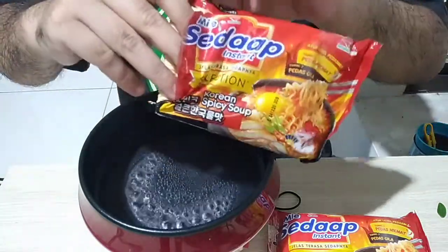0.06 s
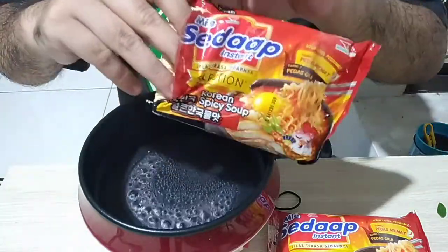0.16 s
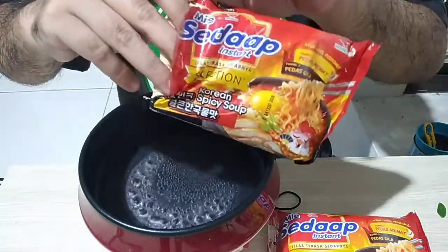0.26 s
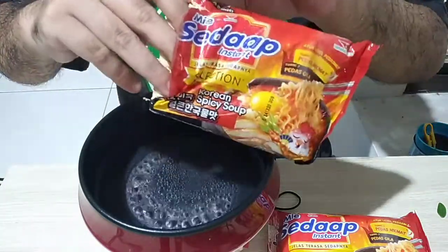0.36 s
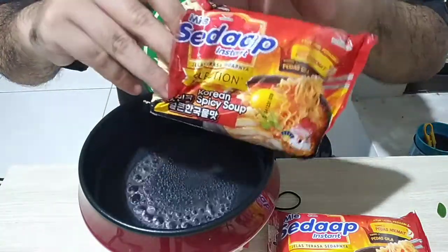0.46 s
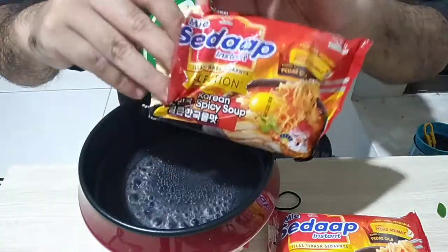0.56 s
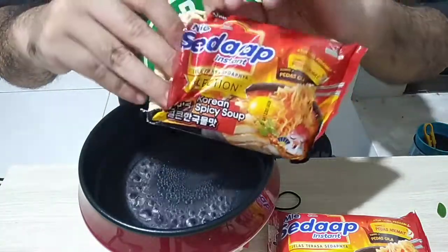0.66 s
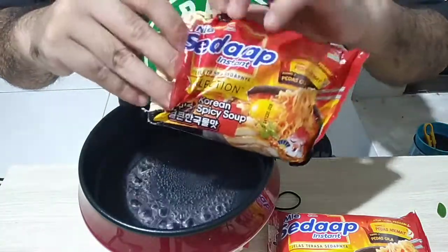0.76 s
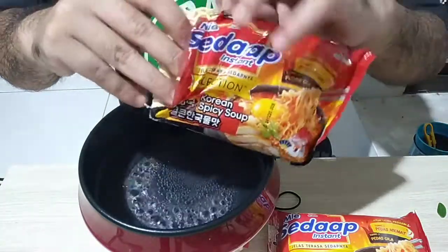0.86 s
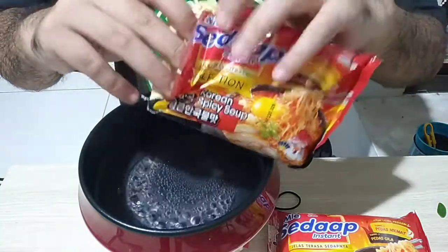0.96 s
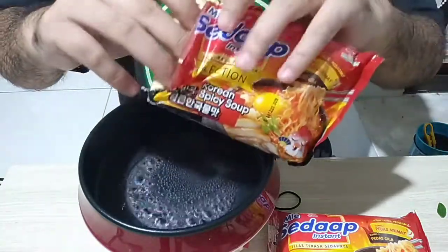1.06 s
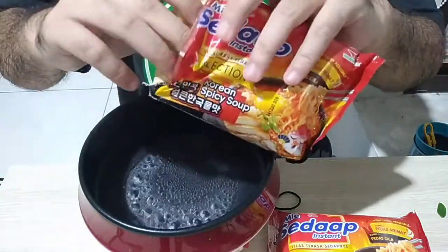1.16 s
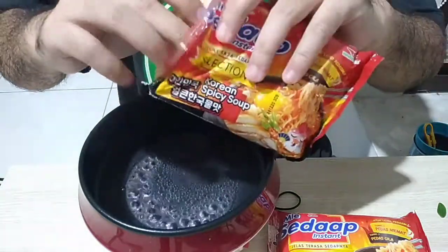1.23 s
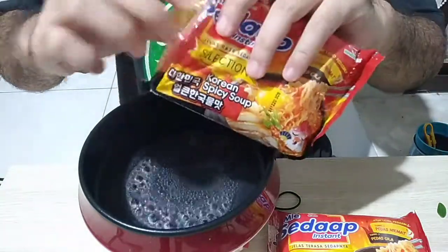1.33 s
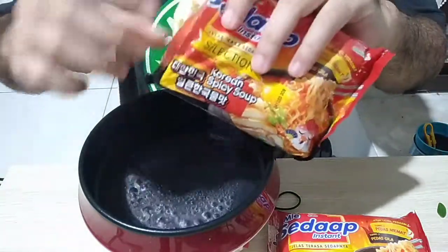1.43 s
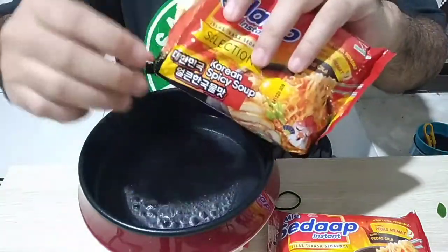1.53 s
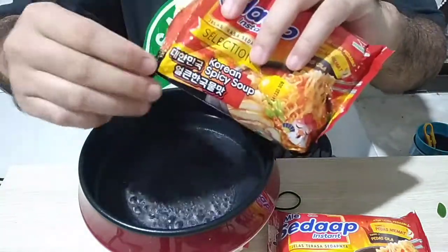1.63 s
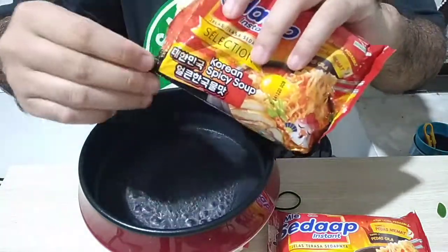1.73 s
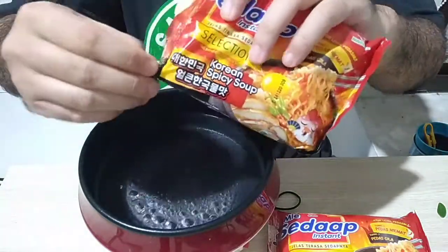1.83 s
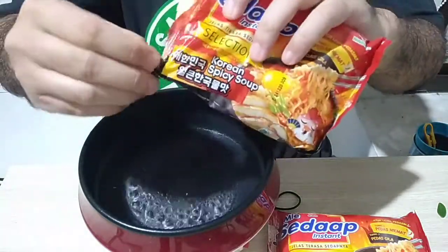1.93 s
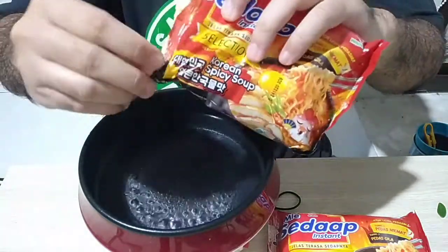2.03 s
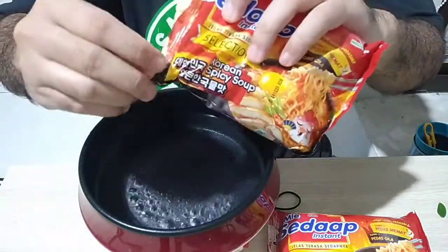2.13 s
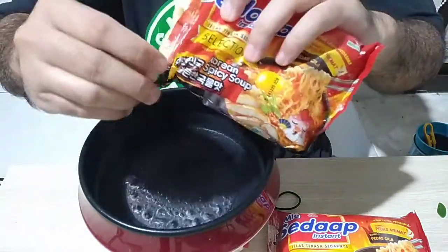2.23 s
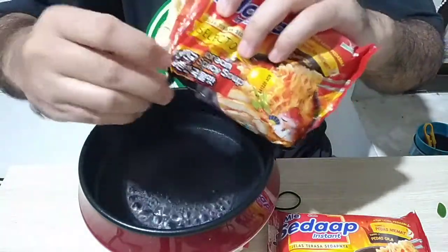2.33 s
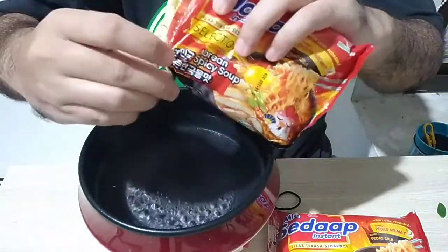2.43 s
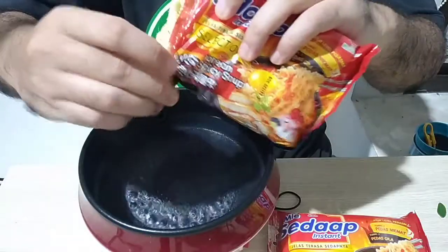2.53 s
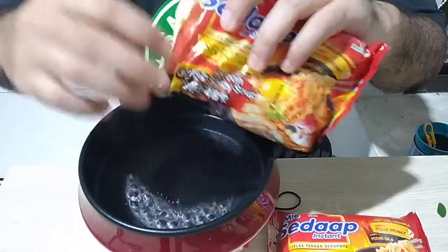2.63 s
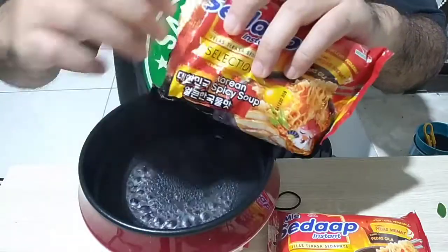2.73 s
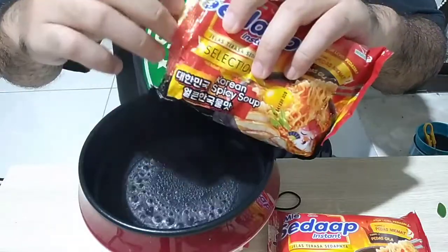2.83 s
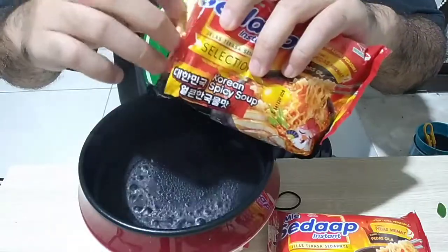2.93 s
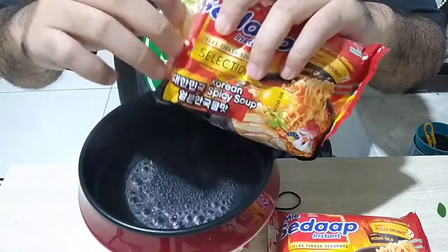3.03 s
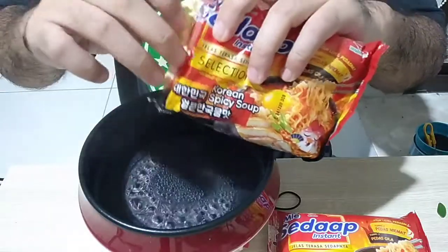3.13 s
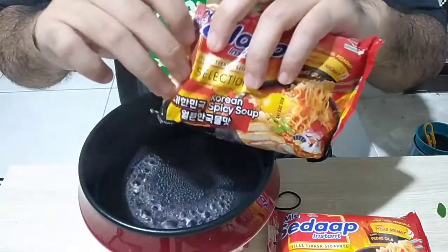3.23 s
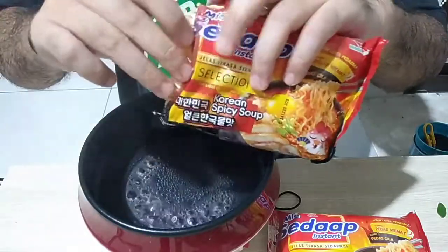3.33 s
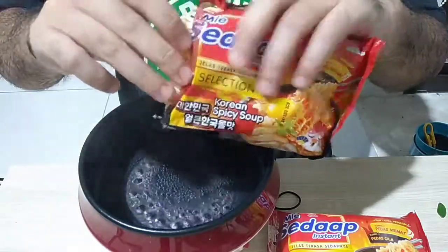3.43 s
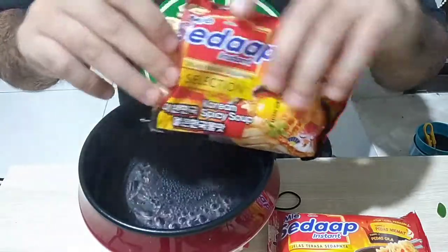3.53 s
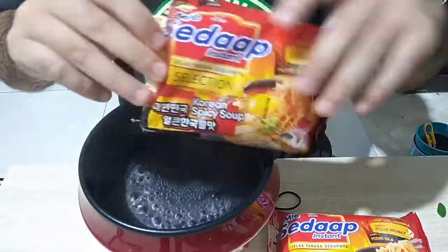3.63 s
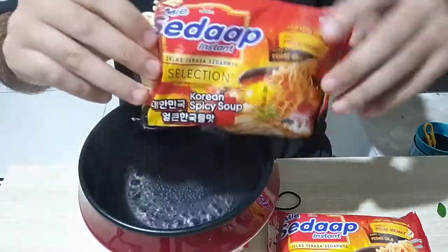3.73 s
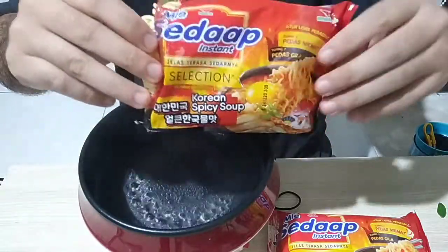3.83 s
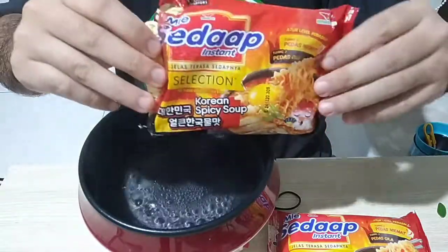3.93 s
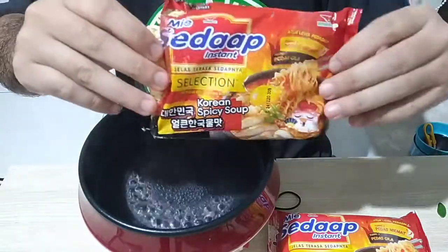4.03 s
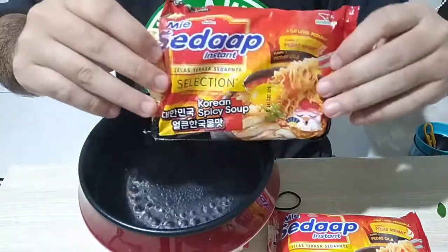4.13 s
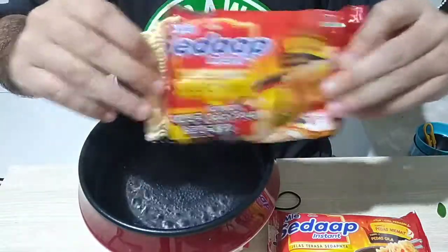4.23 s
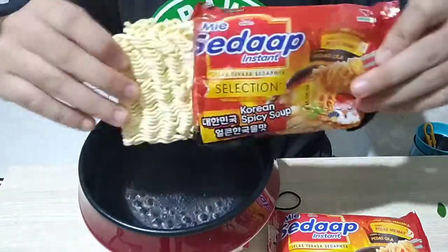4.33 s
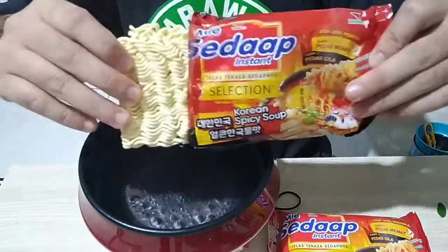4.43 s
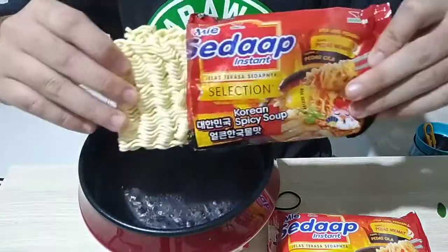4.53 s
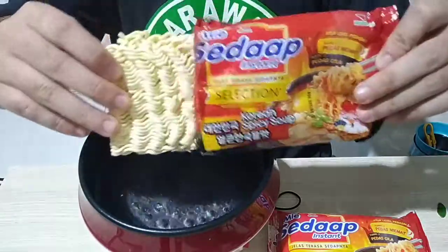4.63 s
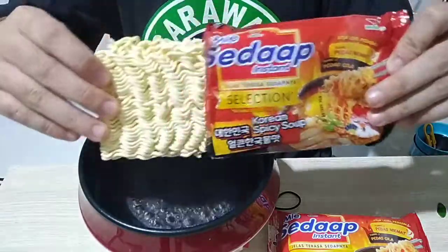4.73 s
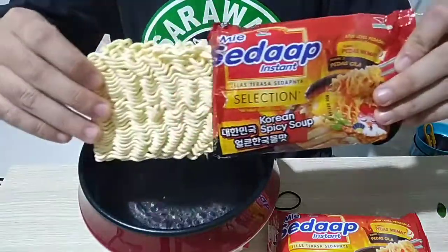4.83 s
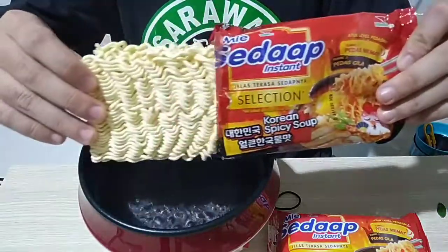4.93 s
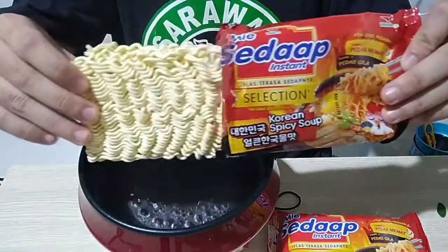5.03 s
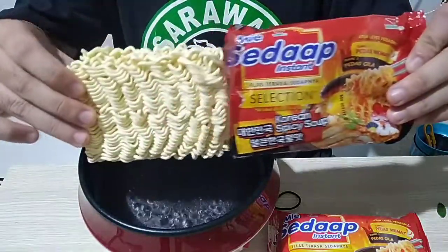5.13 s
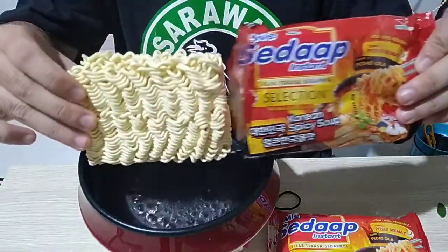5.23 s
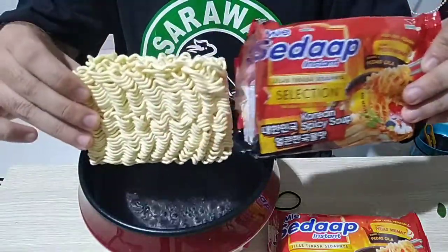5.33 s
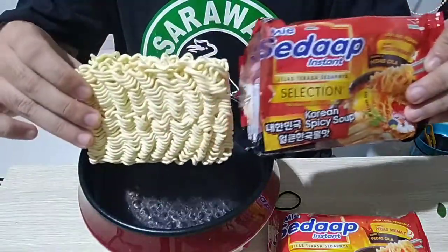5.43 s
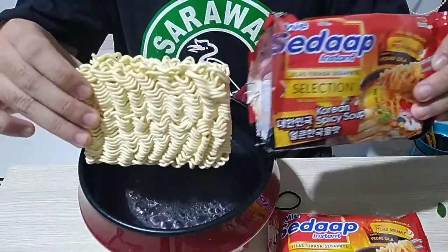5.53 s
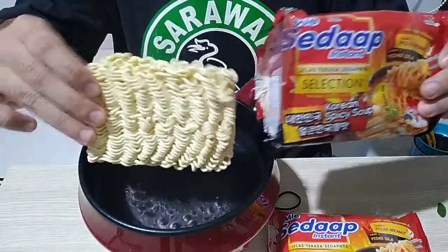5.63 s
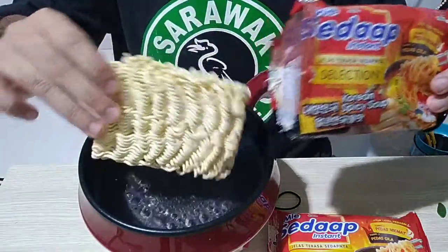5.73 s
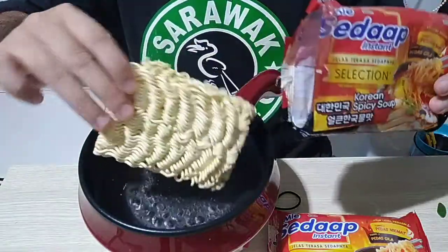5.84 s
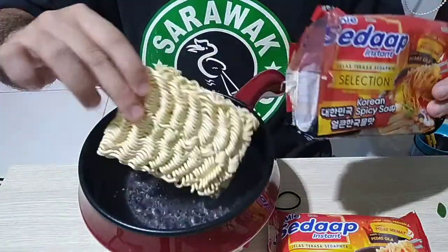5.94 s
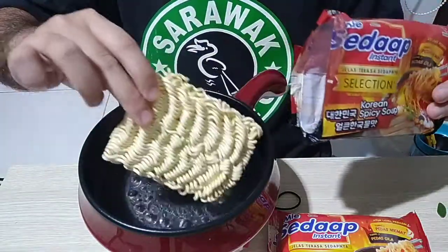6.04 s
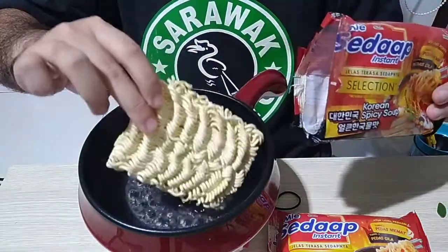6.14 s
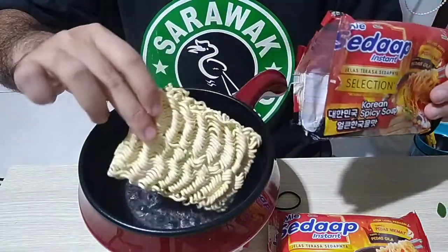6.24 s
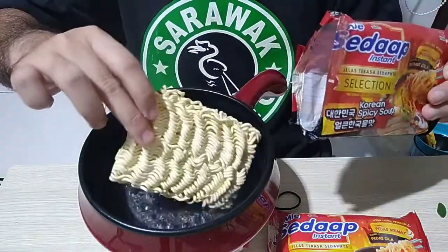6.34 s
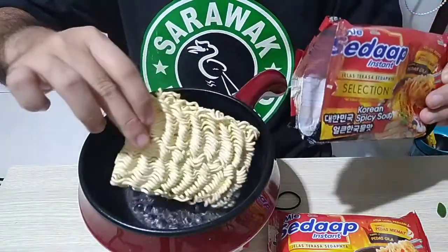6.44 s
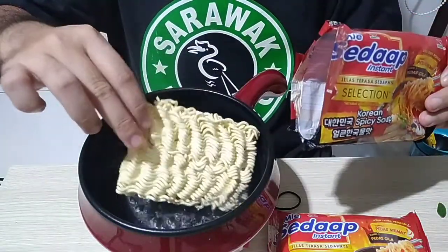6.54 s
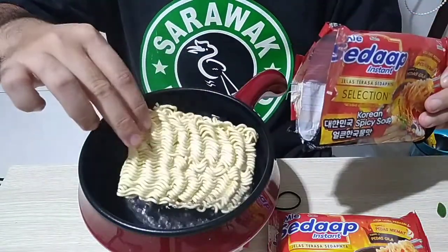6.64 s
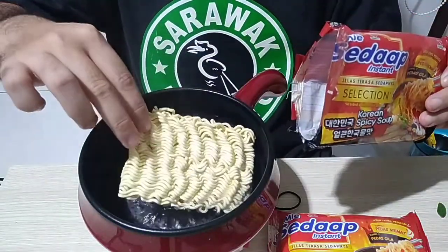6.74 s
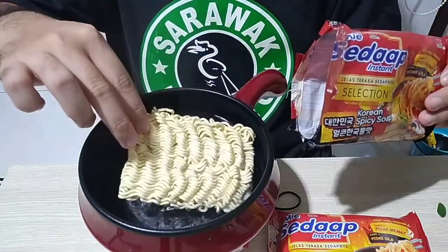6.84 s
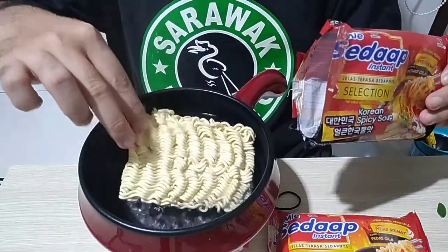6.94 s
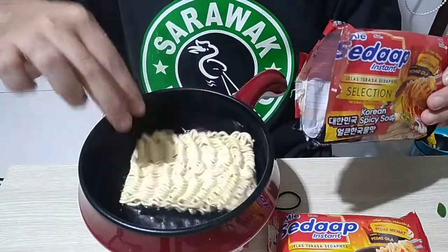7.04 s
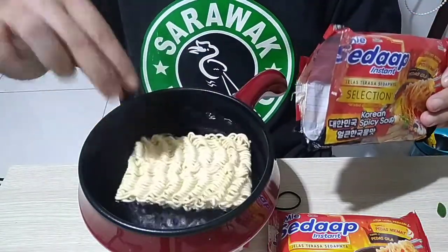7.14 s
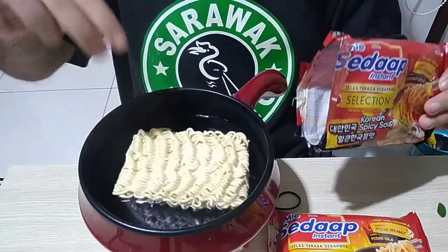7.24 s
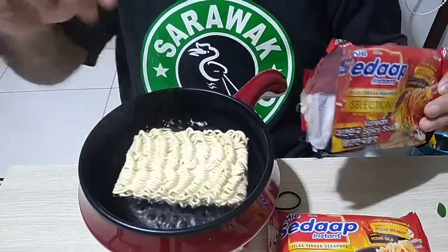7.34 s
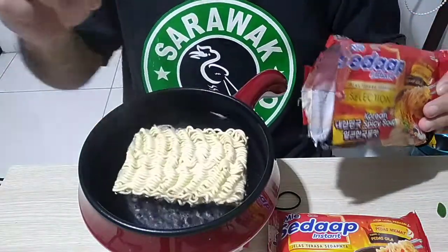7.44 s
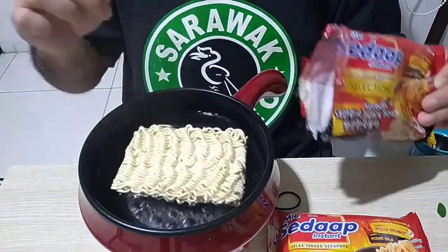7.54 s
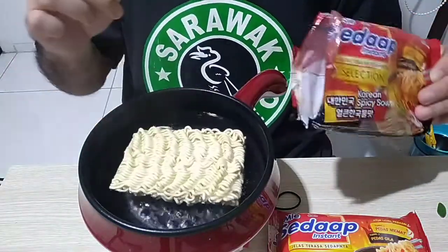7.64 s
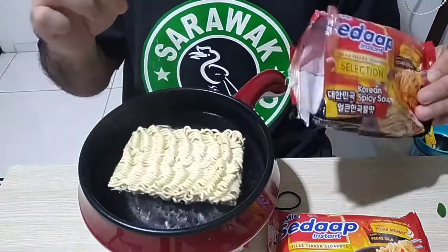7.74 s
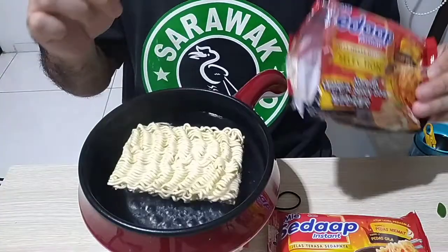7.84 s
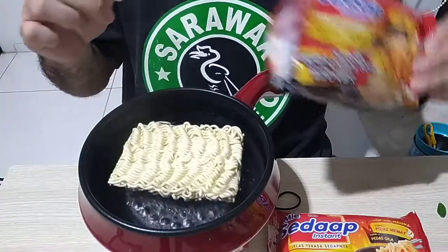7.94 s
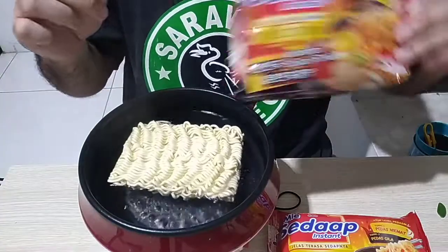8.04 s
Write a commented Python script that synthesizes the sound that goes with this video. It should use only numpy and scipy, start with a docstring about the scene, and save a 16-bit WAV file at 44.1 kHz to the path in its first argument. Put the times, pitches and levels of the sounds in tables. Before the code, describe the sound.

Close, bright crinkling of a plastic noodle packet, one coarse rasp as the block slides free, a dull pot knock, soft simmering and faint crackles.

```python
"""A foil-lined plastic noodle packet is squeezed, opened and emptied over a simmering pot in a tiled kitchen.
Its creases snap one by one and in dense crackles: short bursts of noise and tone, coloured by film and panels.
The noodle block rasps out as gritty noise and bumps the pot; pot and table answer with damped tones.
Behind it the pot rumbles, blips, sings and fizzes, and a heater whines faintly.
A two-port microphone with a strong treble resonance listens from close by."""
import sys
import numpy as np
from scipy import signal
from scipy.fft import rfft, irfft, next_fast_len
from scipy.io import wavfile
from scipy.ndimage import uniform_filter1d, map_coordinates

SR = 44100
rng = np.random.default_rng(int(sys.argv[2]) if len(sys.argv) > 2 else 0)


def bounce(signal):
    """Save signal as a 16-bit WAV file at the path given by the first command-line argument."""
    frames = np.transpose(np.atleast_2d(signal))
    limited = np.clip(frames, -1, 1)
    pcm = np.round(limited * 32767).astype(np.int16)
    wavfile.write(sys.argv[1], SR, pcm)


N = 356328  # length in samples


def amp(db):
    """Decibels to gain."""
    return 10 ** (np.asarray(db) / 20)


def unit(x):
    """Scaled to rms 1."""
    return x / np.sqrt(np.mean(x ** 2) + 1e-20)


def along(points, hz):
    """Reads (Hz, value) points on a log frequency axis."""
    point_hz, value = np.transpose(points)
    return np.interp(np.log(hz + 1), np.log(point_hz + 1), value)


def curves(rows):
    """One value per sample for each column after the time."""
    s, *columns = np.transpose(rows)
    return np.array([np.interp(np.arange(N) / SR, s, column) for column in columns])


def wobble(rate):
    """A smooth random curve with this many knots a second."""
    knots = rng.standard_normal(int(N * rate / SR) + 4)
    return map_coordinates(knots, [np.arange(N) * rate / SR])


def swells(rows, rise, fall):
    """Gain per sample for each dB column: every row rises, holds and dies away, in dB per second."""
    t, rows = np.arange(0, N / SR + .01, .001), np.array(rows)
    start = rows[:, :1]
    end = start + np.abs(rows[:, 1:2])
    shape = amp(-rise * np.maximum(start - t, 0) - fall * np.maximum(t - end, 0))
    gains = amp(rows[:, 2:]).T @ shape
    return np.array([np.interp(np.arange(N) / SR, t, gain) for gain in gains])


def filtered(x, response):
    """x times a complex response of frequency."""
    m = 2 * next_fast_len((N + SR // 2) // 2)
    return irfft(rfft(x, m) * response(np.fft.rfftfreq(m, 1 / SR)), m)[..., :N]


def colour(spectrum):
    """A causal filter of unit power gain with the shape of the given spectrum."""
    def response(hz):
        # folding the cepstrum forward in time gives the phase that makes the filter causal
        cepstrum = irfft(np.log(amp(along(spectrum, hz))))
        cepstrum = cepstrum * np.r_[1, np.full(len(hz) - 2, 2), 1, np.zeros(len(hz) - 2)]
        log_gain = rfft(cepstrum)
        return unit(np.abs(np.exp(log_gain))) * np.exp(1j * log_gain.imag)
    return response


def pair(alike):
    """Left and right noise with the given likeness, 0 to 1."""
    a, b = rng.standard_normal((2, N))
    angle = np.arccos(np.clip(alike, 0, 1)) / 2
    return np.array([np.cos(angle) * a + np.sin(angle) * b, np.cos(angle) * a - np.sin(angle) * b])


def patchy(x, depth_db):
    """x with random patches of gain in time and frequency."""
    z = signal.stft(x, nperseg=512)[2]
    field = uniform_filter1d(rng.standard_normal(z.shape[1:]), 4, 0)
    field = uniform_filter1d(field, 8, 1)
    return unit(signal.istft(z * amp(depth_db * unit(field)), nperseg=512)[1][:, :N])


GRIT_DB, GRIT_PER_S = 4, 200  # catches on the film: depth and rate


def gritty(x):
    """x broken into fine uneven catches."""
    return unit(x * amp(GRIT_DB * wobble(GRIT_PER_S)))


def clicks(s, gain, pan_db, hz, tone, t60, alike, size=256):
    """Short bursts, part noise, part the ring of a patch; the left port hears each a little later."""
    draw = rng.standard_normal((len(s), 2 * size + 3))
    a, b = draw[:, 3:size + 3], draw[:, size + 3:]
    t = np.arange(size) / SR
    life = t / (t60 * np.exp(.25 * draw[:, :1]))  # some bursts die sooner than others
    shape = amp(-60 * life) * (1 - np.exp(-life / .12)) ** 2 * gain[:, None]
    # even out the luck of the noise draw, so the noise keeps its energy
    noise_size = np.linalg.norm(a * shape, axis=1, keepdims=True) + 1e-20
    shape *= np.linalg.norm(shape, axis=1, keepdims=True) / noise_size
    alike = np.clip(alike, 0, 1)
    ringing = tone * np.sin(2 * np.pi * hz[:, None] * t + 4 * draw[:, 2:3])
    left = (a + ringing) * shape * amp(pan_db / 2)[:, None]
    right = (alike * a + np.sqrt(1 - alike ** 2) * b + ringing) * shape * amp(-pan_db / 2)[:, None]
    lag = np.round(SR * (.00014 + .00003 * draw[:, 1])).astype(int)
    # each burst peaks at its time s
    first = np.round(s * SR).astype(int) - shape.argmax(axis=1)
    at = first[:, None] + np.arange(size) + size
    ears = [(at + lag[:, None], left), (at, right)]
    return np.array([np.bincount(i.ravel(), w.ravel(), N + SR)[size:N + size] for i, w in ears])


def crackle(spread_db, mid_hz, tone, t60, count, size=192):
    """Clumps of tiny creases: many faint, a few strong, each at its own pitch."""
    draw = rng.random((count, 4))
    clump = np.cumsum(amp(5 * wobble(45)))
    s = np.searchsorted(clump, draw[:, 0] * clump[-1]) / SR
    gain = amp(-spread_db * np.log(draw[:, 1] + 0.015))
    pan_db = 8 * (draw[:, 2] - .5)
    hz = mid_hz * 2 ** (1.87 * (draw[:, 3] - .5))
    return unit(clicks(s, gain, pan_db, hz, tone, t60, 0.9, size=size))


# how fast each pitch dies away between tiled walls: pitch_hz [Hz], t60_s [s]
KITCHEN_DECAY = [(200, 0.23), (1000, 0.2), (3000, 0.29), (5500, 0.031), (8000, 0.092), (14000, 0.13)]


def kitchen(x, size=12000):
    """Tiled walls answer after a few milliseconds, with a new random tail for each stretch of sound."""
    out = np.zeros((2, N + 2 * SR))
    for i in range(0, N, size):
        hz, t, z = signal.stft(rng.standard_normal((2, SR // 2)), SR, nperseg=256)
        decay = amp(-60 * t / along(KITCHEN_DECAY, hz)[:, None])
        tail = signal.istft(z * decay, SR, nperseg=256)[1]
        wet = signal.fftconvolve(x[:, i:i + size], tail / np.linalg.norm(tail[0]), axes=1)
        out[:, i + 250:i + 250 + wet.shape[1]] += wet
    return out[:, :N]


# thin electric whine, before its wobble: time_s [s], level_db [dB]
WHINE_LEVEL = [(5.45, -100), (5.6, -76), (6.2, -83), (6.5, -76), (6.7, -105)]


def whine():
    """The heater's faint steady tone with a restless level."""
    return amp(curves(WHINE_LEVEL) + 2.7 * wobble(32)) * np.sin(2 * np.pi * 7730 * np.arange(N) / SR)


# bursts of small bubbles: start_s [s], hold_s [s], level_db [dB]
FIZZ_BURSTS = [(6.0, 0.011, -74), (6.15, 0.013, -55.5), (6.25, 0.12, -64.5), (6.57, 0.023, -65.5),
               (6.8, 0.046, -72), (6.98, 0.048, -59.5)]
FIZZ_RISE_DB_PER_S, FIZZ_FALL_DB_PER_S, FIZZ_REST_DB = 2000, 155, -85


def fizz():
    """Bursts of bubbles as treble noise; the noise also flickers in small random patches."""
    bursts = swells(FIZZ_BURSTS, FIZZ_RISE_DB_PER_S, FIZZ_FALL_DB_PER_S) + amp(FIZZ_REST_DB)
    return bursts * amp(2 * wobble(25)) * filtered(patchy(pair(0), 4), colour(FILM_COLOUR))


# levels of the hot pot, before their wobble; the swell at 6.31 s is the noodle block sloshing in the pot: #
# time_s [s], rumble_db [dB], song_db [dB]
SIMMER_LEVELS = [(5.3, -72.5, -83.5), (5.72, -67.5, -76.5), (5.9, -72.5, -78), (6.19, -73, -72.5),
                 (6.31, -59, -71), (6.45, -73, -75), (6.9, -72.5, -76), (8.08, -69.5, -72)]
# tone of the kitchen background and rumble: pitch_hz [Hz], relative level_db [dB per Hz]
RUMBLE_COLOUR = [(24, -52.5), (40, -18.5), (85, 0.5), (150, -4), (240, -3.5), (350, -4), (480, -10),
                 (900, -27), (1400, -27.5), (1900, -29.5), (3000, -30.5), (4700, -42), (6000, -37.5),
                 (14000, -43.5), (14600, -61)]
BUBBLES, BUBBLE_HZ, BUBBLE_DB = 260, 310, -6.5  # how many, middle pitch, level over the rumble curve


def simmer():
    """The hot pot rumbles as low noise, sings in a narrow band and blips with short low tones."""
    rumble_db, song_db = curves(SIMMER_LEVELS)
    rumble = amp(rumble_db + 1.5 * wobble(12)) * filtered(patchy(pair(.7), 2.5), colour(RUMBLE_COLOUR))
    band = lambda f: 1j * f * 40 / (1077 ** 2 - f * f + 1j * f * 40)  # 40 Hz wide
    song = amp(song_db + 4 * wobble(35)) * unit(filtered(pair(0.13), band))
    s, octaves, strength = rng.random((BUBBLES, 3)).T
    hz = BUBBLE_HZ * 2 ** (1.6 * (octaves - .5))
    blips = clicks(s * (N / SR - .1), amp(-12 * strength), 0 * s, hz, 6, .08, .7, size=3072)
    blips = amp(rumble_db + BUBBLE_DB) * unit(filtered(blips, lambda f: f < 900))
    return rumble + song + blips


# bubbles set the pot wall humming, before the wobble:
# start_s [s], hold_s [s], low_modes_db [dB], high_modes_db [dB]
WALL_HUMS = [(5.664, 0.093, -76, -78.5), (5.954, .06, -86, -85.5), (6.146, 0.013, -70, -64),
             (6.38, 0.06, -84, -79), (6.566, 0.055, -75.5, -74), (6.923, 0.0403, -90, -87)]
# low group and high group of pot wall modes: pitch_hz [Hz], width_hz [Hz], relative level_db [dB]
WALL_MODES = [
    [(1290, 37, 0.5), (1564, 53, -0.5)],
    [(2668, 89, -3), (4670, 110, 2)],
]


def hums():
    """Faint narrow bands of noise that come and go in the pot wall, one band for each wall mode."""
    def wall(modes):
        return lambda f: sum(amp(db) * 1j * f * width / (hz * hz - f * f + 1j * f * width)
                             for hz, width, db in modes)

    out = 0
    for gain, modes in zip(swells(WALL_HUMS, 598.4, 250), WALL_MODES):
        out = out + gain * amp(3 * wobble(59)) * unit(filtered(pair(0.41), wall(modes)))
    return out


def ring(modes, t, attack_s):
    """Damped tones, at new strengths and slightly new pitches for each blow."""
    out = 0
    for hz, db, t60 in modes:
        fade = amp(db + 2 * rng.normal() - 60 * t / t60)
        out = out + fade * np.sin(2 * np.pi * hz * (1 + rng.normal() / 40) * t)
    return out * (1 - np.exp(-t / attack_s))


# bumps that reach the table: start_s [s], level_db [dB], then each part against that level:
# pot_body_db [dB], pot_rim_db [dB], table_overtone_db [dB]
BLOWS = [(6.144, -40, 6, 9, -5), (6.154, -44, 6, 11, -1), (6.163, -38, -2, 2, -3),
         (6.175, -31.5, -13, -28, -1.5), (6.215, -40, -7, -17, 10), (6.238, -42, -3, -15, 5.5),
         (6.282, -18.5, -13, -38, -11.5), (6.358, -39, -9, -44, -3), (6.385, -36, -16, -33, -3),
         (6.42, -41, -22, -19, 2), (6.596, -45, -22, -26, -9), (6.657, -45.5, -25, -31.5, -7)]
# lowest mode and overtone of the table, before random changes: pitch_hz [Hz], level_db [dB], t60_s [s]
TABLE_MODES = [
    [(96, 2, 0.13)],
    [(145.5, 0, 0.11)],
]
# body modes and rim modes of the pot, before random changes: pitch_hz [Hz], level_db [dB], t60_s [s]
POT_MODES = [
    [(248, -8, 0.094), (354, -6, 0.089), (504, -17.5, 0.065)],
    [(740, -13, 0.063), (782, -11, 0.054), (1404, -32, 0.049)],
]


def bumps():
    """The noodle block touches the pot: body and rim knock, the table booms."""
    out, t = np.zeros(N + SR), np.arange(SR // 2) / SR
    for s, db, body_db, rim_db, over_db in BLOWS:
        knock = amp(body_db) * ring(POT_MODES[0], t, 0.0032) + amp(rim_db) * ring(POT_MODES[1], t, 0.0029)
        boom = ring(TABLE_MODES[0], t, 0.032) + amp(over_db) * ring(TABLE_MODES[1], t, 0.02)
        out[round(s * SR):][:len(t)] += amp(db + 1.5) * (boom + knock)
    return out[:N] * amp([[-.8], [.8]])  # a little stronger on the right


# the noodle block is yanked through the opening: start_s [s], hold_s [s], level_db [dB]
PULLS = [(4.288, 0.067, -13)]
# tone of noodles rasping on the film: pitch_hz [Hz], relative level_db [dB per Hz]
RASP_COLOUR = [(300, -29), (700, -14), (2200, -18), (3300, -11.5), (5500, -13), (8500, -1.5), (10500, -11),
               (14000, -25), (15500, -49)]
PULL_RISE_DB_PER_S, PULL_FALL_DB_PER_S = 1997, 221.5


def pull():
    """The noodle block drags on the film: a dense, coarse rasp of noise that starts abruptly."""
    gain = swells(PULLS, PULL_RISE_DB_PER_S, PULL_FALL_DB_PER_S)
    return filtered(gain * gritty(pair(0.11)), colour(RASP_COLOUR))


# tone of the table under the packet: pitch_hz [Hz], relative level_db [dB per Hz]
BOOM_COLOUR = [(20, -43.5), (50, -24.5), (70, -13.5), (95, -7), (145, -12.5), (220, -12.5), (500, -72)]


def shaken_table(gain):
    """The hands shake the table: low noise with an uneven level."""
    return filtered(gain * amp(3 * wobble(20)) * pair(.95), colour(BOOM_COLOUR))


# tone of the air and noodles in the packet: pitch_hz [Hz], relative level_db [dB per Hz]
BULK_COLOUR = [(90, -29), (160, -6.5), (320, 5.5), (520, -1), (800, 0.5), (1300, -20), (2500, -74.5)]
PUFF_DB = -21  # a snapping panel also pushes the air in the packet


def shaken_bulk(gain, rung):
    """Air and noodles are shaken: low noise and coarse crackle, with a puff from each snap."""
    shaken = unit(pair(.7) + .3 * crackle(2, 380, 1, .02, count=1200, size=768))
    return filtered(gain * shaken + amp(PUFF_DB) * rung, colour(BULK_COLOUR))


# tone of the empty film rustling: pitch_hz [Hz], relative level_db [dB per Hz]
EMPTY_COLOUR = [(1200, -48), (2450, -34.5), (2800, -10.5), (4500, -13), (6000, -8.5), (8300, -0.5),
                (11000, -11), (13800, -15.5), (15500, -43.5)]


def empty_rustle(grip, empty):
    """Fingers slide on the slack, empty film as gritty noise; its level also flickers in small random patches
    of time and pitch."""
    return filtered(grip * empty * gritty(patchy(pair(.3), 3)), colour(EMPTY_COLOUR))


# tone of the flat faces of the packet: pitch_hz [Hz], relative level_db [dB per Hz]
PANEL_COLOUR = [(350, -26.5), (600, -15), (1200, -5.5), (2400, -0.5), (3600, -2.5), (5000, -1.5),
                (7000, -24.5), (11000, -82)]
RASP_DB = -10  # sliding heard through the full packet's panels, over the rustle
SNAP_LOW_HZ = 694  # a single crease moves little film, so its sound thins out below this


def panels(gain, grip, empty_db, rung):
    """The flat faces ring with the crackle, the sliding and the single snaps."""
    faces = gain * crackle(2.7, 1400, .7, 0.009, count=3000, size=384)
    faces = faces + grip * amp(RASP_DB + empty_db) * gritty(patchy(pair(.4), 5))
    faces = faces + filtered(rung, lambda f: (1j * f / (SNAP_LOW_HZ + 1j * f)) ** 2)
    return filtered(faces, colour(PANEL_COLOUR))


# tone of crease clicks through the microphone resonance: pitch_hz [Hz], relative level_db [dB per Hz]
FILM_COLOUR = [(1600, -54), (2500, -19.5), (3400, -25), (5000, -8), (6500, -5.5), (8660, 5), (10500, -5.5),
               (12600, -15.5), (14100, -17.5), (14700, -36.5), (16000, -60)]


def film(gain, grip, empty, snapped):
    """Creases click singly and in crackles in the film, over a soft rustle until the packet is empty."""
    sound = gain * crackle(3.2, 8000, .4, .0045, count=5500) + snapped
    sound = sound + grip * ~empty * gritty(patchy(pair(.1), 4))
    return filtered(sound, colour(FILM_COLOUR))


# single creases that buckle: start_s [s], level_db [dB, before the drives below],
# panel_share_db [dB over that level], panel_pitch_hz [Hz], left_over_right_db [dB]
CREASE_SNAPS = [(0.0054, -14, -6.5, 2090, 5.5), (0.0364, -17, -17.5, 1280, 10.5),
                (0.0775, -9.5, -14.5, 3150, 1.5), (0.104, -3, -23.5, 2330, -1.5),
                (0.135, -8, -12.5, 3470, 4), (0.141, -9.5, -14.5, 2000, 9.5),
                (0.2171, -12.5, -13, 2700, -2.5), (0.2209, -13, -13, 1910, 9.5),
                (0.237, -17, -14.5, 2300, 4), (0.2648, -25, -8.5, 3100, 2), (0.31, -16, -11, 2700, 4),
                (0.336, -25.5, -31.5, 2820, 3), (0.39, -26.5, -5, 2580, -2), (0.399, -1.5, -27.5, 2300, 2),
                (0.4305, -15, -9.5, 2400, 10), (0.457, -19.5, -7, 2860, -4), (0.4966, -9.5, -20, 2770, 1.5),
                (0.513, -22.5, -4, 2020, 7), (0.5275, -11, -15, 3060, 9.5), (0.5566, -14, -26, 2650, 6.5),
                (0.585, -21.5, -13.5, 1560, 2), (0.593, -9, -28, 2230, 2.5),
                (0.6033, -3.5, -27.5, 1890, 9.5), (0.6598, -6.5, -29.5, 2240, 9),
                (0.668, -6, -20.5, 2200, -5.5), (0.683, -8.5, -21.5, 2010, 4.5), (0.6865, -9, -19, 2010, 8),
                (0.701, -8, -14, 2100, 2), (0.7134, -12, -16, 2200, 4.5), (0.7217, 0.5, -16, 1830, 5),
                (0.7252, -8.5, -22.5, 1200, 6), (0.758, -9.5, -15.5, 1700, 5.5),
                (0.767, -7, -13.5, 1740, -5.5), (0.842, -22, -16.5, 1990, 9.5),
                (0.845, -19.5, -33, 2000, 4.5), (0.87, -7.5, -28, 2290, 6), (0.951, -16, -19.5, 1640, -1),
                (0.9704, -11.5, -24.5, 3420, 3.5), (0.9981, -18, -30.5, 2140, 1.5),
                (1.012, -5, -26.5, 1800, 3.5), (1.042, -5, -15.5, 1840, 8), (1.0807, -21, -14, 2030, 2.5),
                (1.131, -6, -24, 1880, 3), (1.158, -13, -11.5, 1440, 1.5), (1.169, -14, -13, 1610, 0),
                (1.031, -19.5, -13.5, 1800, -1), (1.187, -12.5, -11.5, 1200, -0.5),
                (1.2125, -16.5, -2.5, 1690, 0.5), (1.225, -2.5, -24, 1700, 5), (1.2337, -8.5, -16, 1940, 3),
                (1.258, -10.5, -25, 1900, 3), (1.262, -12, -8.5, 2020, -1), (1.273, 3, -29, 1960, 1),
                (1.2826, -9.5, -10, 740, 1), (1.3258, -6.5, -28, 2230, 6), (1.329, -4.5, -31.5, 797, -3),
                (1.3498, -23.5, -11.5, 1900, 1.5), (1.3643, 0, -58.5, 1940, -1),
                (1.3822, -3.5, -13, 1900, 4), (1.3967, -7, -46.5, 1800, 0.5),
                (1.419, -12.5, -31, 1780, 0.5), (1.4224, -8, -25.5, 1440, -0.5),
                (1.4645, -12.5, -12.5, 2200, -3), (1.503, -15.5, -13.5, 3440, -1),
                (1.5903, -30.5, -11, 2470, -2), (1.6568, -17.5, -31, 2170, -2),
                (1.6765, -8.5, -22.5, 1970, -3.5), (1.721, -15.5, -27, 1870, -4),
                (1.7435, -22.5, -14, 2470, -2), (1.695, -19.5, -10.5, 1920, 3),
                (1.767, -26.5, -19, 1850, 0.5), (1.7886, -13.5, -17, 840, 5.5),
                (1.7997, -7.5, -17.5, 1950, -0.5), (1.8065, -15, -9, 2160, 10.5),
                (1.8552, -10, -15.5, 795, 5.5), (1.8737, 2, -26, 3258, 5.5), (1.895, -10.5, -24, 1370, 7.5),
                (1.924, -18, -10.5, 1390, 3.5), (1.97, -16, -27, 1040, 1.5), (1.9923, -16, -9.5, 790, 3),
                (1.998, -7.5, -8, 930, -1), (2.0016, 0.5, -23, 2140, -3.5), (2.028, 4, -22.5, 1780, 3.5),
                (2.0392, -1.5, -14, 1340, -0.5), (2.046, -3.5, -13.5, 1000, 0.5),
                (2.2371, -18, -20, 1820, 1.5), (2.2571, -11, -17, 2020, -11), (2.3306, -11.5, -15, 1660, 0),
                (2.361, -14, -18, 1640, -2), (2.369, -14, -18.5, 1640, -0.5), (2.401, -15.5, -26, 2000, 0),
                (2.381, -9.5, -14.5, 990, 4), (2.413, -10, -30, 2060, -5), (2.427, -13, -13.5, 2260, 4),
                (2.438, -6, -27, 2230, 2), (2.461, -13, -28, 3280, 8.5), (2.5747, -17.5, -17, 1710, 1),
                (2.599, -12, -45.5, 2380, 8.5), (2.614, -20.5, -34.5, 1780, -4.5),
                (2.6378, -15, -34, 2440, 11), (2.654, 0.5, -31, 2170, -2), (2.6681, -5, -26, 1940, -7.5),
                (2.6726, -6.5, -24, 2010, 12), (2.757, -25, -3.5, 1900, 3), (2.794, -8.5, -20.5, 1400, 3),
                (2.825, -4.5, -12, 1850, -4), (2.832, -8.5, -17.5, 780, 0.5), (2.872, -21, -14, 1800, -1.5),
                (2.855, -4, -17, 1770, 3.5), (2.877, -14, -9.5, 1810, 2.5), (2.887, -1, -41, 1730, 2),
                (2.964, -17.5, -31, 1300, -2), (2.9908, -7, -23, 2240, -3.5), (2.999, -7.5, -16, 2160, -2),
                (3.017, -20, -10, 1100, 1.5), (3.033, -4.5, -27, 1903, -0.5), (3.041, -16, -15, 1850, 0),
                (3.049, -12.5, -11.5, 1000, -0.5), (3.089, -17, -21, 2000, 2),
                (3.0623, -6.5, -27, 2150, -1), (3.0777, -15, -5.5, 765, 3.5),
                (3.108, -5.5, -18.5, 3020, 2.5), (3.176, -19, -13.5, 1990, -7),
                (3.1954, -10, -17, 1780, 2.5), (3.206, -16, -22, 1490, 3.5), (3.234, -15.5, -19, 1830, 1),
                (3.2605, -16.5, -13, 2000, 0.5), (3.273, -6.5, -25, 1810, -2.5),
                (3.2823, -13.5, -19.5, 1820, 4.5), (3.3165, -13.5, -24, 1920, -3),
                (3.3728, -4.5, -17.5, 1785, -3.5), (3.4, -10.5, -14, 1770, 9),
                (3.407, -12.5, -16, 1880, -6.5), (3.416, -12, -13.5, 1930, 4), (3.4285, 4, -37, 1780, -4),
                (3.503, -6, -18.5, 1430, 2), (3.539, -5, -15, 1970, 3), (3.5508, -18.5, -7, 3220, -2),
                (3.6394, -11.5, -18.5, 1410, 7.5), (3.678, -16.5, -15.5, 860, -3),
                (3.7089, -15.5, -12.5, 3050, 2.5), (3.7741, -16, -15, 3150, 3), (3.8637, -9, -14, 1020, 3),
                (3.909, -11, -17, 1720, 4), (3.928, -2, -22.5, 900, 9.5), (3.9757, -11.5, -12.5, 740, 2),
                (3.9924, -13.5, -20.5, 1850, -2.5), (4.02, -8.5, -11, 1200, -1),
                (4.0263, 2, -25, 1990, 2.5), (4.04, -4, -20, 1920, 4), (4.052, -1, -18.5, 2720, -0.5),
                (4.062, -9, -13, 1300, 1), (4.12, -7.5, -18.5, 1270, 2), (4.206, -22.5, -4, 1050, 0.5),
                (4.23, -21.5, -22, 2000, -2.5), (4.2398, -6.5, -12, 1473, 2), (4.251, -11, -11, 800, 4.5),
                (4.2697, -0.5, -18, 2320, 7), (4.272, -7.5, -12.5, 895, 2), (4.2898, 2, -12.5, 1268, -2.5),
                (4.303, 1, -10, 2600, 1), (4.316, -0.5, -18, 2200, -3.5), (4.363, -6, -14.5, 2300, 1.5),
                (4.378, -8.5, -20.5, 2280, -1), (4.3565, 3, -9, 3267, 2), (4.514, -7, -17.5, 2460, -3),
                (4.5294, -12, -22.5, 950, 15), (4.569, -4, -19.5, 2840, -1), (4.611, -16, -16, 2340, 2),
                (4.645, -18, -24.5, 2800, -3), (4.666, -13.5, -25, 2450, -1.5), (4.706, -22, -8, 2000, -5),
                (4.715, -25, -20, 2500, 1), (4.738, -19, -24, 2540, -5.5), (4.896, -21.5, -20.5, 2470, 3),
                (4.7514, -14, -12.5, 2740, 3.5), (4.937, -19, -16.5, 2600, 0.5),
                (4.9567, -22, -21, 2610, 0.5), (4.965, -20, -24, 2600, -0.5), (4.972, -19.5, -19, 2600, -1),
                (4.986, -13, -14.5, 2820, 0.5), (5.088, -15.5, -4.5, 2760, 0.5),
                (5.108, -12.5, -23, 2890, -4.5), (5.39, -57.5, 18, 3040, -26),
                (5.4343, -13.5, -6.5, 3440, 2.5), (7.031, -25, -42, 3280, 6), (7.035, -26, -39, 3280, 0),
                (7.047, -31, -36, 3200, -5), (7.067, -42, -36, 3200, 2), (7.15, -41, -34, 3200, -0.5),
                (7.074, -26, -25, 2780, 8.5), (7.093, -30, -16, 3280, 13), (7.114, -31.5, -31, 2930, -2.5),
                (7.236, -38, -22, 3050, 12.5), (7.2475, -36.5, -24, 3210, 1), (7.3913, -36.5, -18, 1226, 6),
                (7.427, -32, -27, 1280, 2), (7.471, -27, -46, 1320, 4.5), (7.4889, -39, -25, 713, 6),
                (7.5456, -21, -23, 1800, -2.5), (7.5699, -24.5, -21, 2980, -5), (7.6182, -15, -41, 2540, 3),
                (7.626, -39, -18, 2500, -6), (7.634, -34, -16, 2600, -2), (7.8015, -15.5, -16.5, 3080, 2.5),
                (7.9443, -35, -19, 3240, -1), (8.045, -39.5, -13, 1080, -5)]
BUCKLE_S = .0014  # onset to peak
INTO_FILM_DB, INTO_PANELS_DB = 9.5, 13.5  # drive of a snap into each resonance
FILM_HZ, FILM_OCTAVES = 8000, 1.1  # each crease clicks at its own pitch: centre and full spread
RINGS_HZ = 650  # large, low panels ring on; small, high ones merely tick


def snaps():
    """Each crease buckles: a bright click in the film and a lower, partly ringing one in its panel."""
    s, db, share_db, hz, pan_db = np.transpose(CREASE_SNAPS)
    peak_s = s + BUCKLE_S
    click_hz = FILM_HZ * 2 ** (FILM_OCTAVES * (rng.random(len(s)) - .5))
    snapped = clicks(peak_s, amp(db + INTO_FILM_DB), pan_db, click_hz, .5, .0037, .9)
    panel_gain = amp(db + share_db + INTO_PANELS_DB)
    rung = clicks(peak_s, panel_gain, pan_db / 2, hz, RINGS_HZ / hz[:, None], .0085, .5, size=448)
    return snapped, rung


# squeezes of the packet: start_s [s], hold_s [s], crackle_db [dB], panels_db [dB], bulk_db [dB], table_db [dB]
HAND_SQUEEZES = [(0.0, 0.0048, -28.5, -47, -62.5, -63), (0.12, 0.081, -43.5, -64.5, -78, -77),
                 (0.4, 0.0068, -36.5, -56.5, -84, -68), (0.48, 0.042, -31, -49.5, -79.5, -91),
                 (0.59, 0.065, -31.5, -38.5, -60.5, -86), (0.655, 0.1, -21.5, -34, -51, -55.5),
                 (0.885, 0.0066, -28.5, -66, -80, -63), (1.0, 0.1, -37, -43, -64, -72),
                 (1.225, 0.12, -28.5, -37.5, -51.5, -72), (1.68, 0.15, -70.5, -50.5, -67, -77.5),
                 (1.815, 0.092, -28, -36, -54, -70.5), (1.995, 0.068, -28.5, -33.5, -44, -60.5),
                 (2.25, 0.024, -38.5, -39.5, -57, -65.5), (2.35, 0.1, -34, -43, -52.5, -67.5),
                 (2.655, 0.066, -36.5, -41.5, -58.5, -65.5), (2.83, 0.085, -32, -42.5, -52, -65.5),
                 (3.01, 0.061, -28.5, -39.5, -55, -71), (3.25, 0.035, -26, -36.5, -74, -77.5),
                 (3.39, 0.059, -24, -32.5, -45.5, -70.5), (3.52, 0.22, -41, -44.5, -57, -69.5),
                 (3.915, 0.006, -40, -31.5, -51.5, -66), (4.02, 0.11, -22.5, -31.5, -41, -63.5),
                 (4.245, 0.0065, -38.5, -35, -46.5, -66.5), (4.3, 0.095, -29, -31, -38, -43),
                 (4.51, 0.01, -29.5, -37.5, -46.5, -56.5), (4.6, 0.62, -57.5, -61, -87.5, -70),
                 (4.7, 0.015, -40, -70, -66, -75), (4.745, 0.009, -38.5, -69.5, -79, -75),
                 (4.785, 0.033, -39.5, -57, -68, -75), (4.9, 0.024, -36, -57, -74, -56),
                 (5.065, 0.022, -36, -62, -77, -78), (5.335, 0.012, -57, -63, -94, -96),
                 (5.45, 0.038, -52.5, -54, -75, -76), (5.53, 0.043, -71, -74, -98, -95),
                 (7.04, 0.071, -43.5, -76, -100, -73), (7.23, 0.015, -47.5, -90, -95, -67.5),
                 (7.55, 0.015, -61, -80, -73, -63.5), (7.64, 0.0093, -53, -57.5, -96.5, -63),
                 (7.82, 0.026, -53, -63, -83, -64), (7.95, 0.0099, -55, -99, -74.5, -83)]
# fingers and noodles sliding on the film: time_s [s], rustle_db [dB]
HAND_GRIP = [(0.0, -39), (0.43, -43.5), (0.65, -44), (0.81, -40), (1.01, -45), (1.3, -31.5), (1.5, -37.5),
             (1.71, -67), (1.92, -37), (2.2, -43), (2.38, -42), (2.55, -45.5), (2.7, -40), (2.9, -41.5),
             (3.28, -40), (3.5, -31), (3.75, -45.5), (4.08, -29), (4.2, -38), (4.28, -24), (4.4, -22.5),
             (4.47, -36.5), (5.08, -34.5), (5.16, -39.5), (5.4, -87.5), (5.5, -120), (7.015, -120),
             (7.025, -40), (7.156, -47), (7.36, -66.5), (7.53, -54.5), (7.55, -46), (7.614, -54),
             (7.624, -43.5), (7.797, -59.5), (7.808, -47.5), (8.08, -59.5)]
# what a mere grip adds, over the rustle: crackle, panels, bulk, table [all dB]
GRIP_SHARES = [-30.5, -22, -31.5, -34.5]
RISE_DB_PER_S, FALL_DB_PER_S = 453.5, 302.5  # into and out of a squeeze
EMPTIED_S, EMPTY_DB = 5.5, -19  # once empty, the slack packet hardly sounds its panels under a grip


def packet():
    """Hands squeeze and grip the packet, driving its film, panels, contents and the table."""
    grip = amp(curves(HAND_GRIP))
    empty = np.arange(N) / SR > EMPTIED_S
    empty_db = empty * EMPTY_DB
    shares_db = np.c_[GRIP_SHARES] + np.zeros(N)
    shares_db[1] += empty_db
    squeezes = swells(HAND_SQUEEZES, RISE_DB_PER_S, FALL_DB_PER_S)
    crease_gain, panel_gain, bulk_gain, table_gain = squeezes + grip * amp(shares_db)
    snapped, rung = snaps()
    creases = film(crease_gain, grip, empty, snapped) + panels(panel_gain, grip, empty_db, rung)
    creases = creases + empty_rustle(grip, empty)
    low = shaken_bulk(bulk_gain, rung) + shaken_table(table_gain)
    return creases, low * amp([[-.8], [.8]])  # the low part is a little stronger on the right


def scene():
    """Pot sounds, whine, bumps and packet together; the kitchen answers the bumps and the creases."""
    background = simmer() + fizz() + whine() + hums()
    knocks = bumps()
    creases, low = packet()
    creases = creases + pull()
    room = amp(-9.5) * (kitchen(creases) + kitchen(knocks))
    return background + knocks + low + creases + room


# difference between the two microphone ports: pitch_hz [Hz], left_over_right_db [dB]
PORT_BALANCE = [(2500, -2), (4500, 0), (6500, -5), (8500, 1), (11000, 6), (14000, -0.5)]
TOP_HZ = 15600  # band limit


def record(dry):
    """The ports differ by pitch; the loudest peaks are rounded off; nothing is kept above the band limit."""
    ports = filtered(dry, lambda hz: amp(along(PORT_BALANCE, hz) * np.array([[.5], [-.5]])))
    clipped = ports / (1 + np.abs(ports) ** 8) ** (1 / 8)
    return filtered(clipped, lambda hz: hz < TOP_HZ)


dry = scene()
out = record(dry)
bounce(out)
```